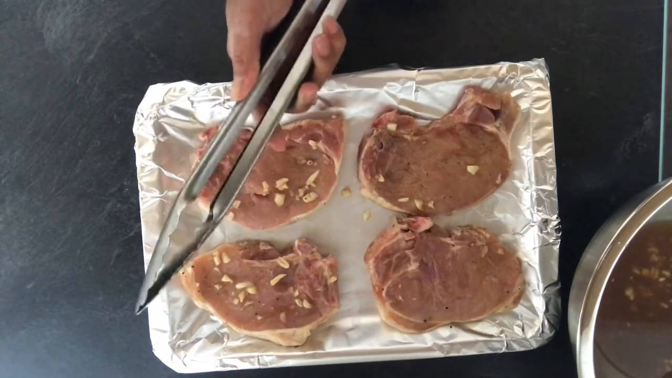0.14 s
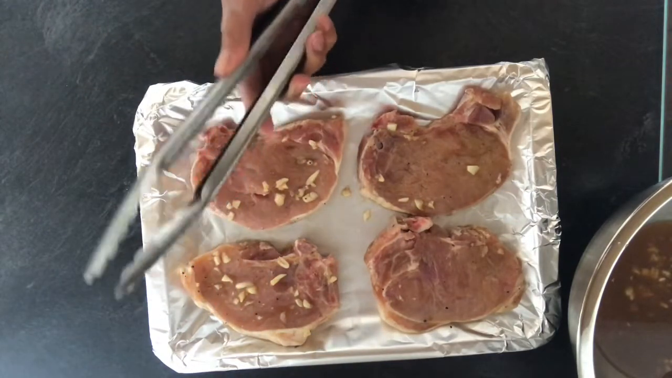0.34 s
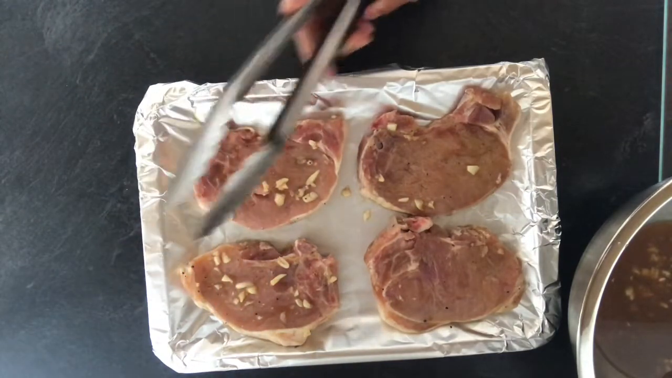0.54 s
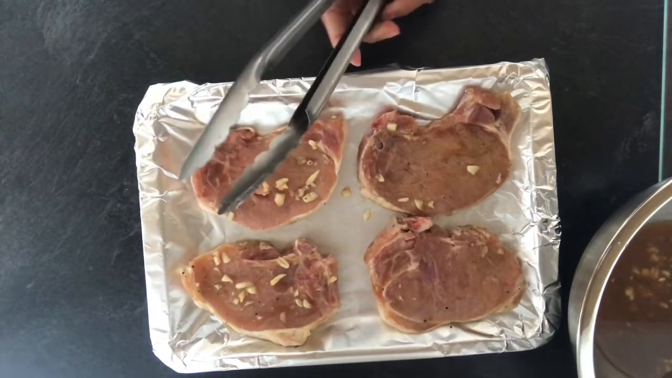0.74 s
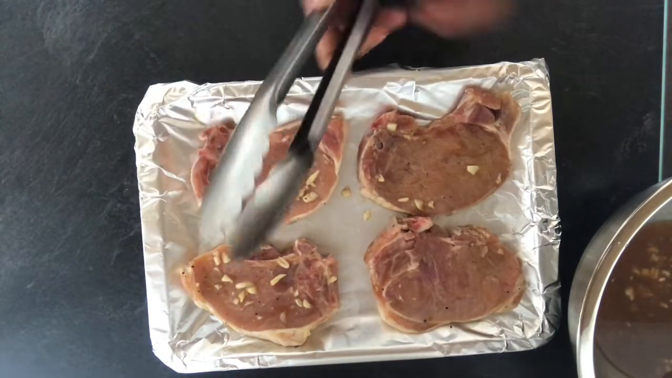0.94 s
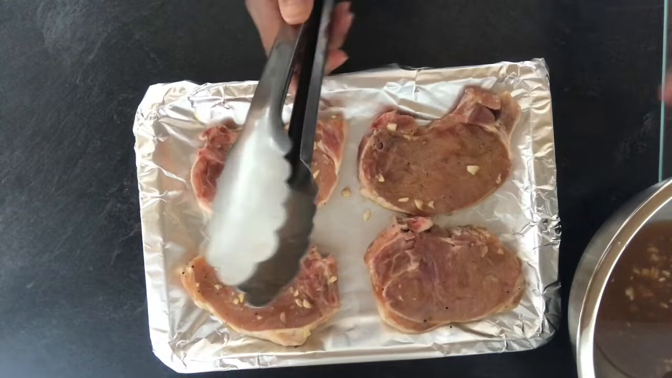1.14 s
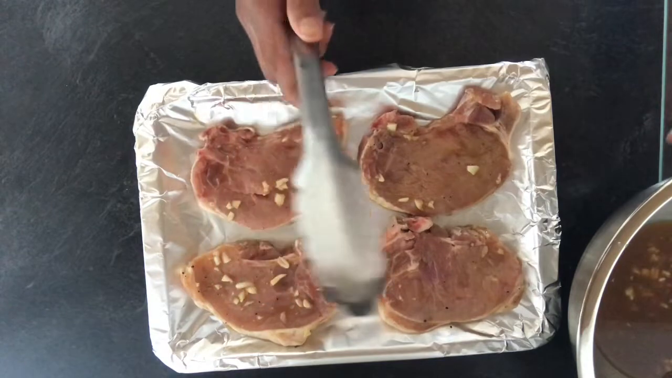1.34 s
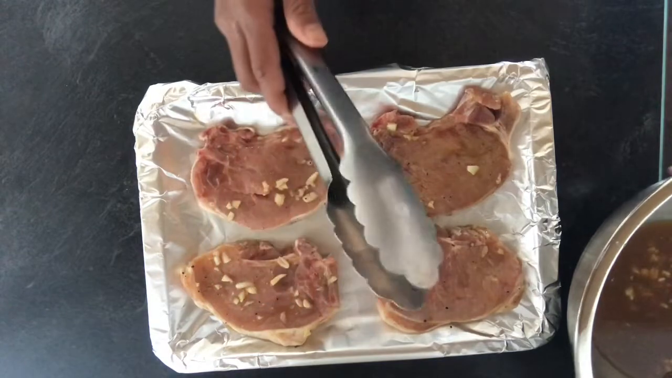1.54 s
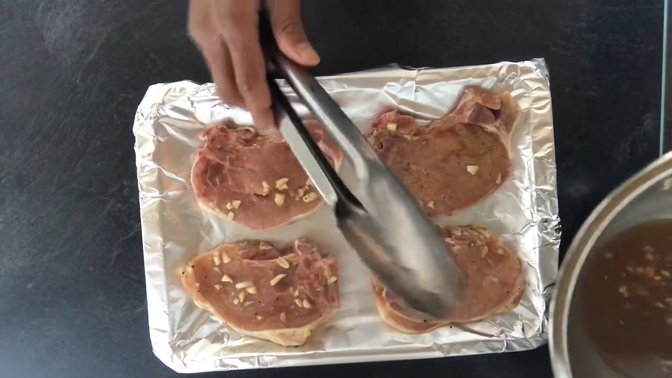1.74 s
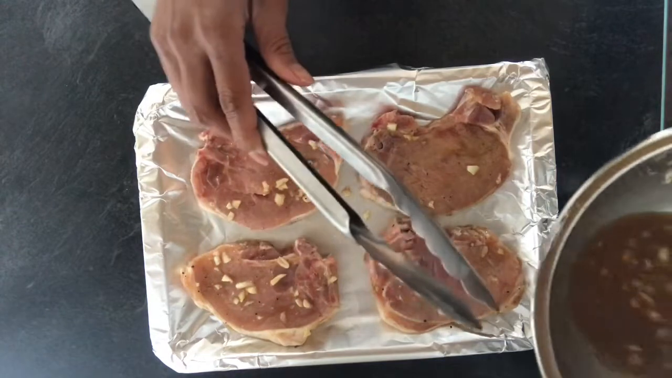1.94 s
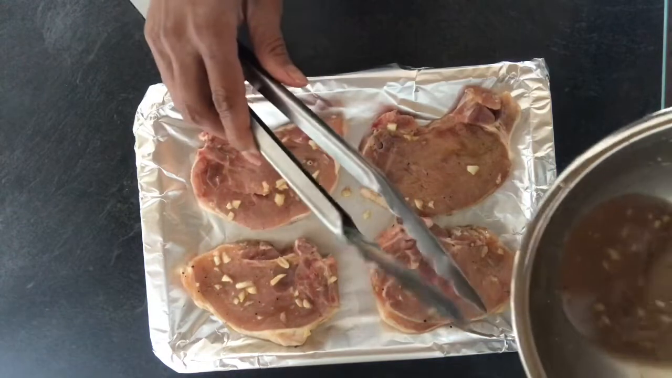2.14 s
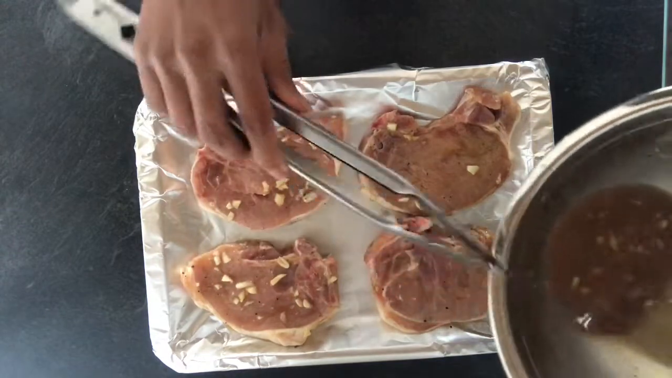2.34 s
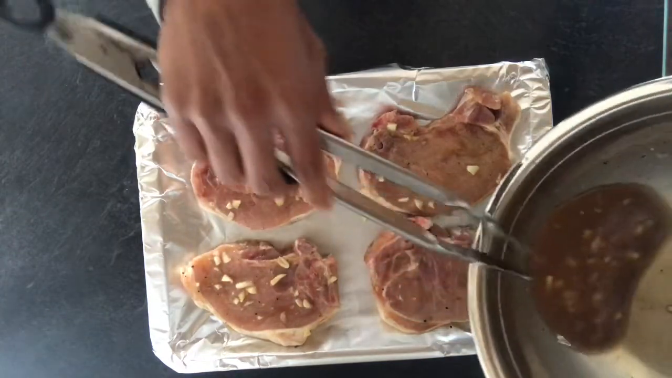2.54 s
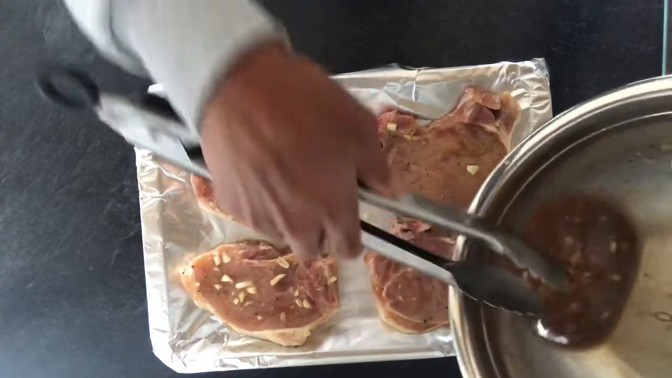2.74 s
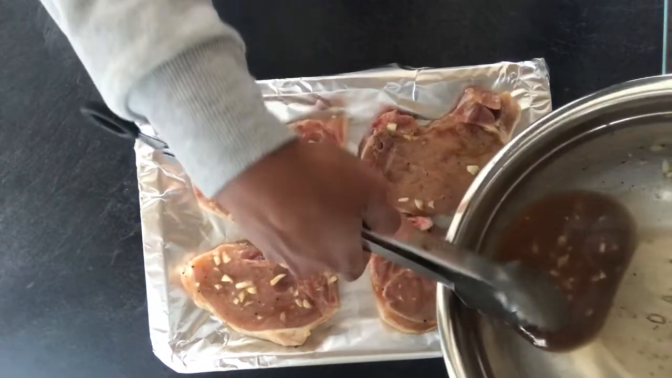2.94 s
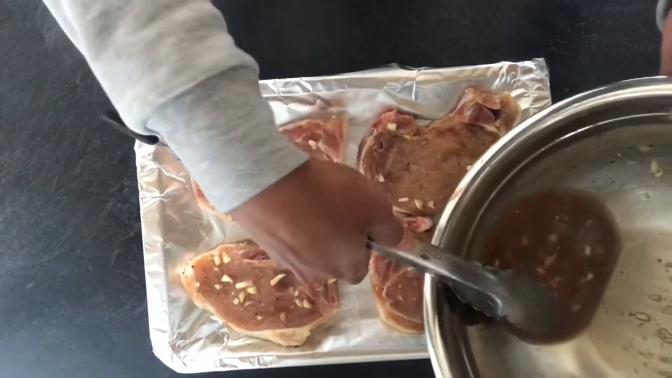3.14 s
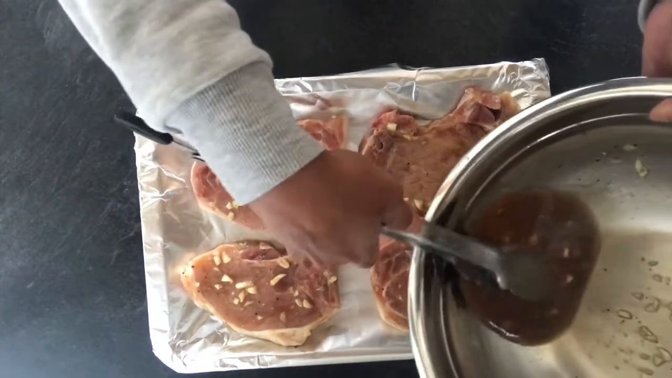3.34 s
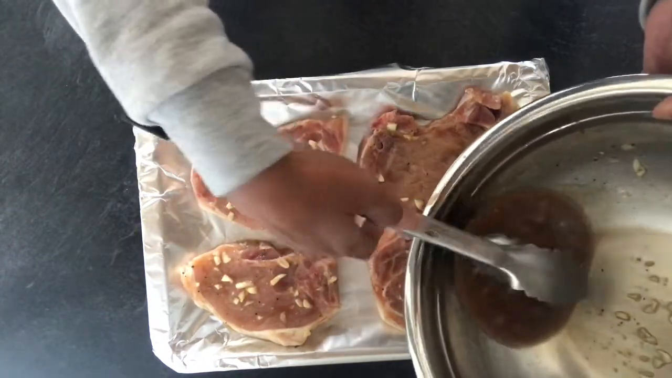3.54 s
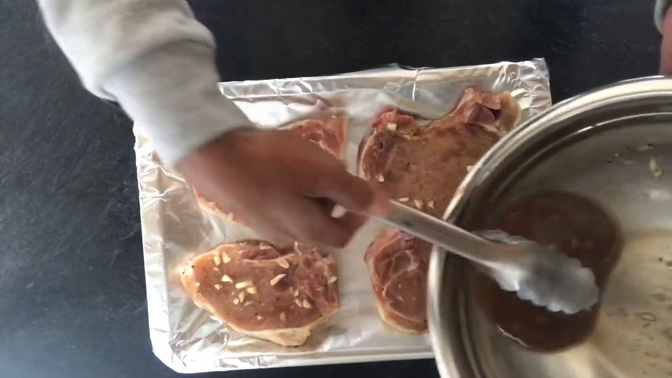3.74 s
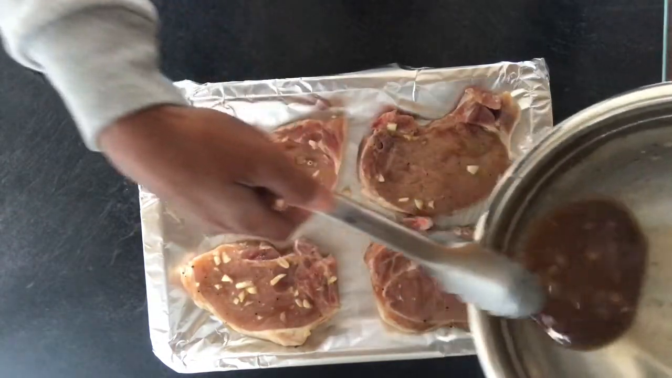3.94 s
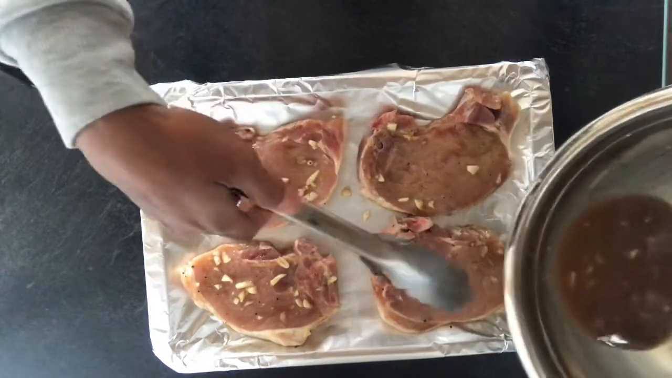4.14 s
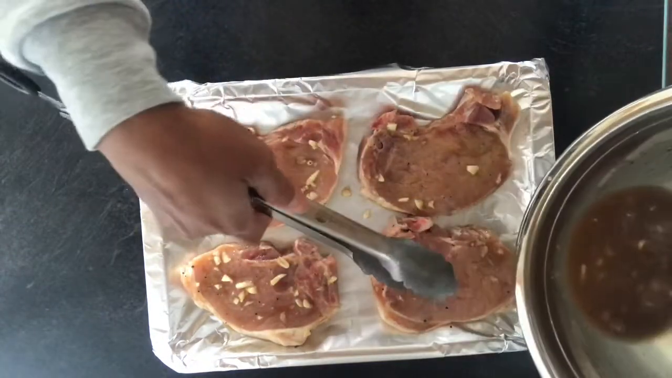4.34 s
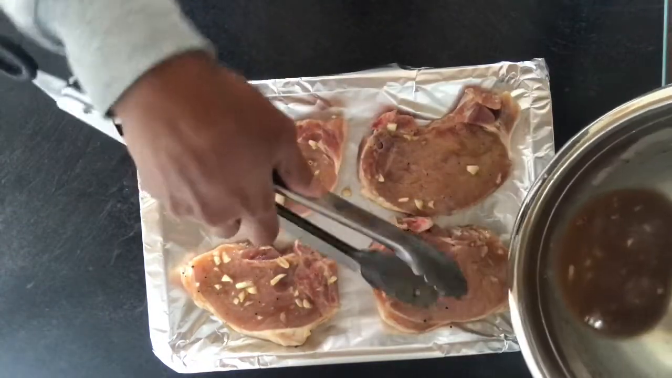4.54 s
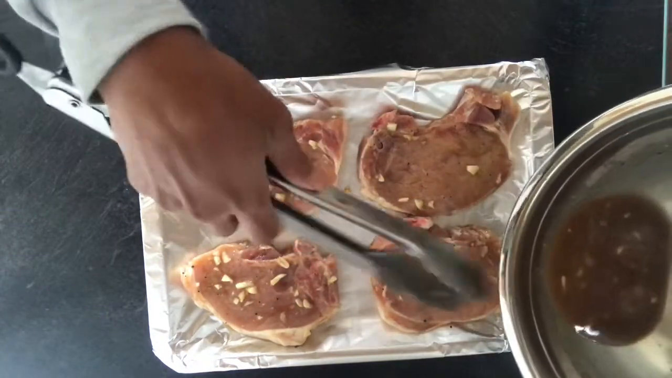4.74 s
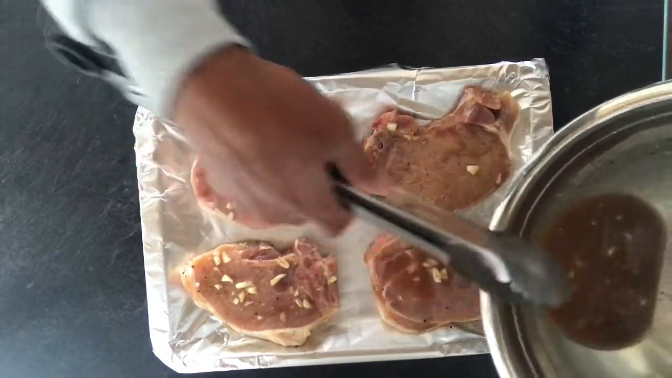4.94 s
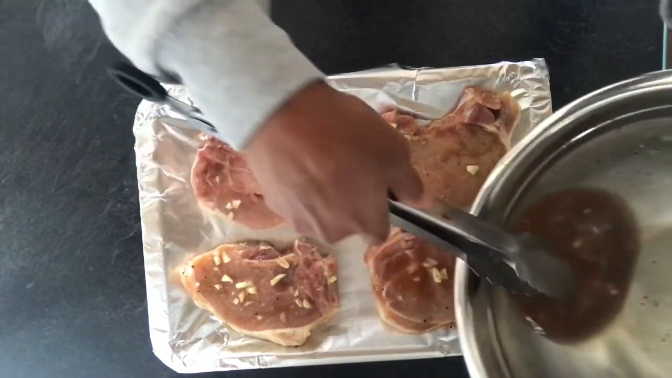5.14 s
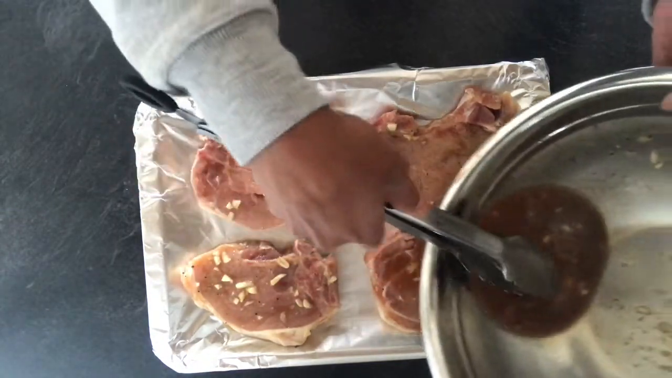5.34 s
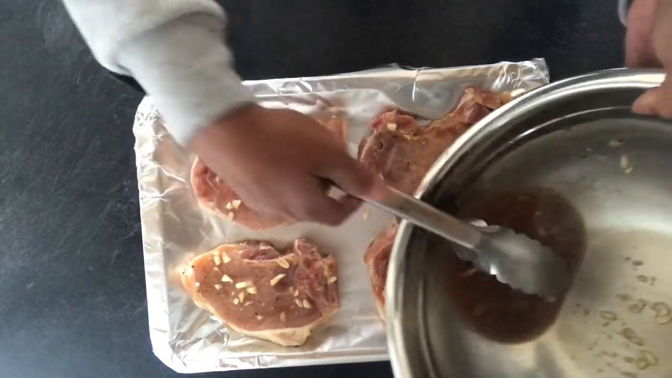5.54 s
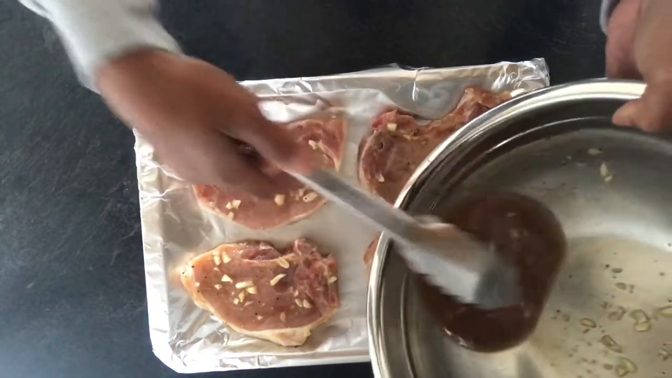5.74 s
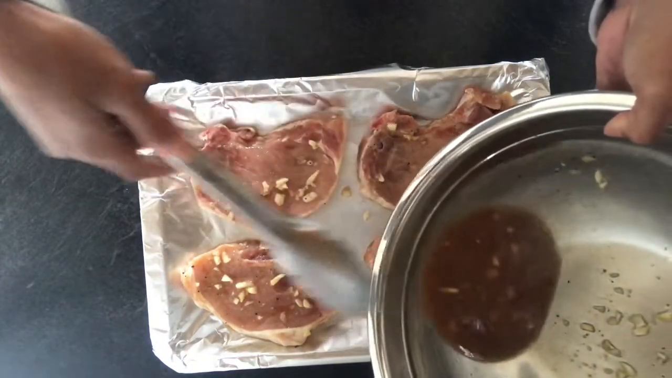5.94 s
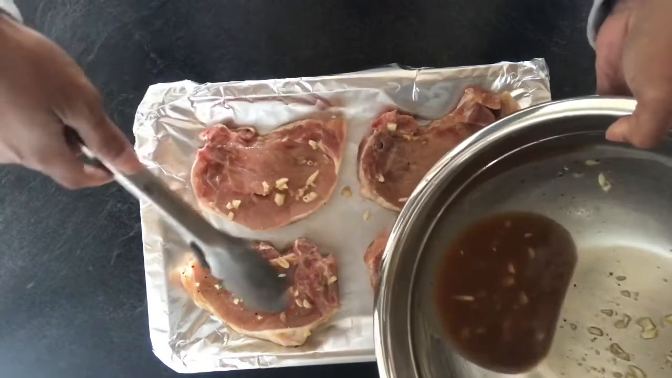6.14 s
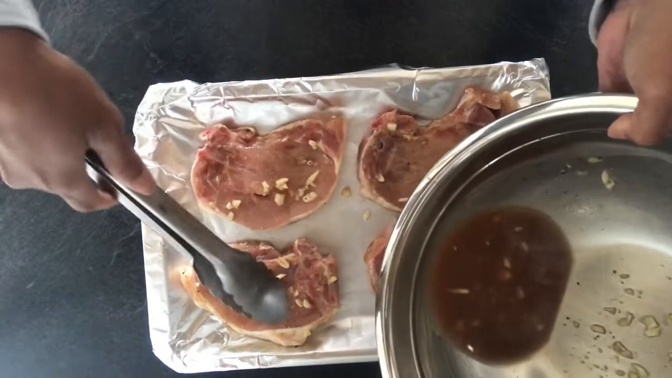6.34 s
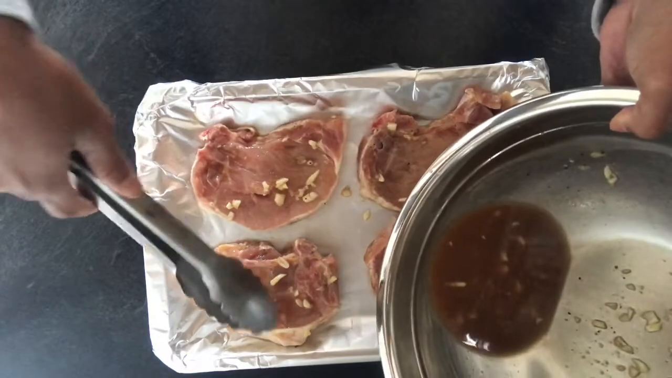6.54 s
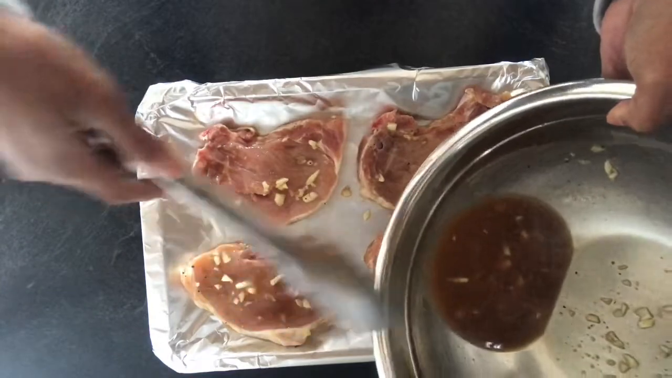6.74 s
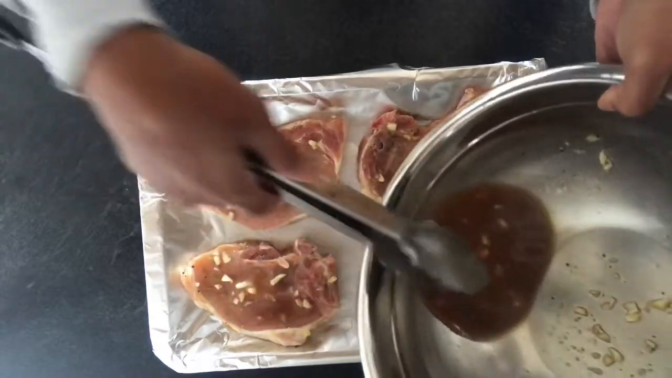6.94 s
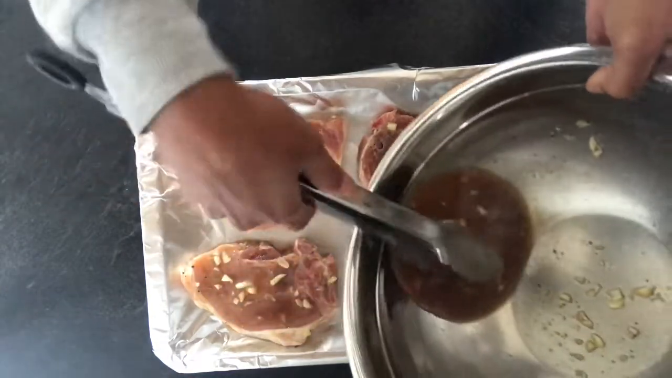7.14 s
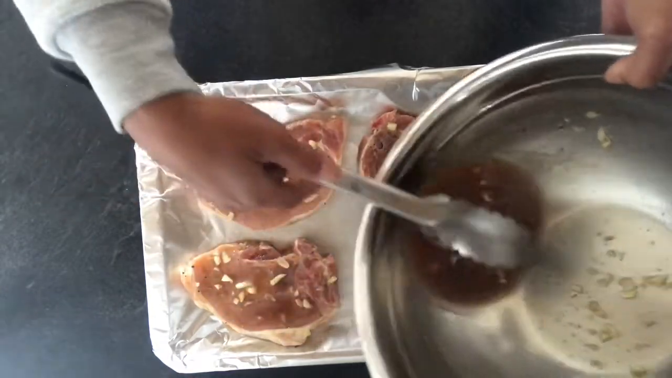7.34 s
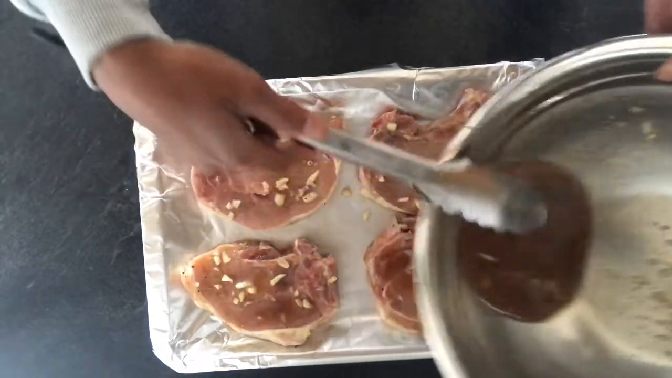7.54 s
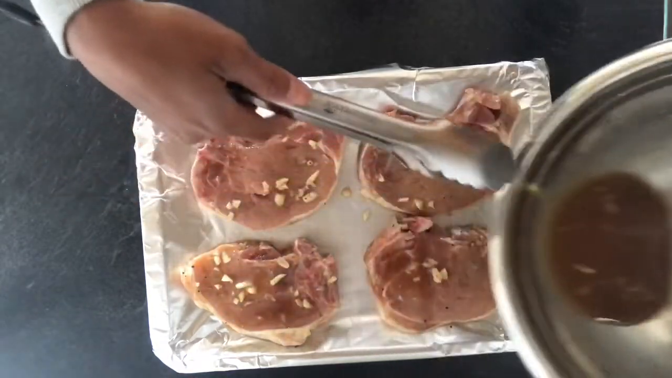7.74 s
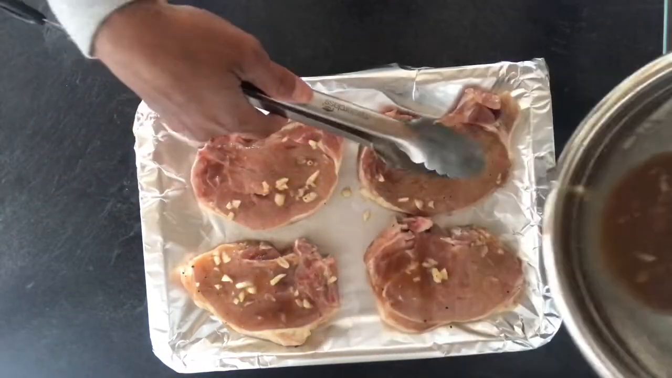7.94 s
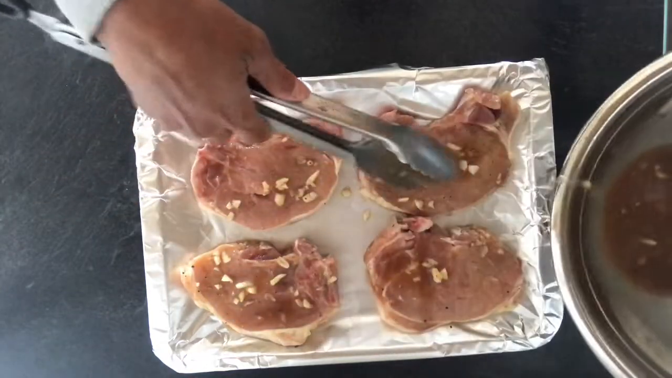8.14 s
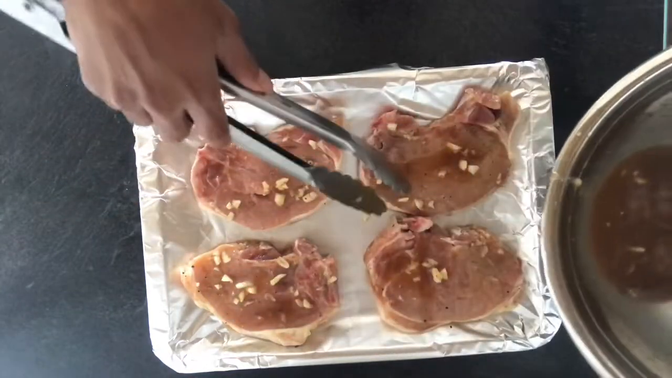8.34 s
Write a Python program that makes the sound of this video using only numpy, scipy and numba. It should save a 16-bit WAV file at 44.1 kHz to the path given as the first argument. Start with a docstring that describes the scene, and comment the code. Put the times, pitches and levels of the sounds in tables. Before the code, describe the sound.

In a quiet kitchen, tongs snap shut nearby, followed by light crinkles of aluminium foil and one dull thud of a bowl on the counter. The tongs knock inside the steel bowl, which rings, then drag and squeak along its wall. A second, louder clang brings another brief scrape and a click of the tips, and a third clang comes near the end. Faint hums waver underneath, and hard walls add a short tail.

```python
"""A steel bowl rings as steel tongs knock, scrape and squeak inside it, over a foil-lined tray in a quiet kitchen.
Each blow is a snap, a clang and a free ring; the tongs also clack shut and click their tips.
Foil rubs and ticks under the hand as its creases snap, and the bowl thuds on the counter once.
Low hums waver over the room's hush, and hard walls add a short tail to the metal and foil."""
import numpy as np
import sys
import numpy as np
from scipy import signal
from scipy.fft import rfft, irfft
from scipy.io import wavfile
from scipy.ndimage import uniform_filter1d
from numba import njit

SR = 44100
rng = np.random.default_rng(int(sys.argv[2]) if len(sys.argv) > 2 else 0)


def digitize_waveform(pressure):
    """Quantize a signal to 16-bit integers and store it at the path in sys.argv[1].

    Rows of a 2-D input are taken as channels; values are limited to [-1, 1].
    """
    field = np.atleast_2d(pressure).T
    bounded = np.clip(field, -1, 1)
    quanta = np.round(bounded * 32767).astype(np.int16)
    wavfile.write(sys.argv[1], SR, quanta)


N = 373968
T = np.arange(N) / SR

# room tone spectrum: f/Hz, level/dB
HUSH_SPECTRUM = [(24, -34.5), (40, 0.5), (69, 2.5), (170, -3), (218, -3.5), (351, -6.5), (485, -10),
                 (608, -9.5), (1820, -17.5), (3670, -19), (4950, -22), (6680, -21), (10500, -29),
                 (12500, -25), (15600, -29)]
# decay of the kitchen's tail: f/Hz, t60/s
ROOM_DECAY = [(200, 0.74), (1000, 0.33), (3500, 0.33), (8000, 0.18), (15000, 0.22)]
# fader rides of the three hums: t/s, level/dB
LOW_HUM_RIDE = [(2.85, -68), (3.22, -53.5), (3.5, -55.5), (3.56, -62.5), (3.989, -57.5), (4.53, -62),
                (4.61, -70.5), (4.9, -55.5), (5.32, -65), (5.6, -76), (5.83, -64.5), (6.33, -78.5),
                (6.708, -63), (7.03, -82), (7.37, -69), (7.6, -74)]
MID_HUM_RIDE = [(7.45, -83), (7.576, -66.5), (8.347, -68.5), (8.48, -79.5)]
HIGH_HUM_RIDE = [(1.95, -76), (1.98, -73.5), (2.69, -57.5), (2.77, -78), (2.82, -53), (2.93, -61.5),
                 (3.71, -64), (3.88, -70), (4.04, -62), (4.11, -79), (4.26, -66.5), (5.6, -78.5),
                 (6.0, -70), (6.22, -83.5), (6.3, -66.5), (6.73, -78), (7.35, -63.5), (7.9, -69),
                 (8.431, -66.5), (8.48, -80)]
# the bowl landing on the counter: t/s, level/dB
THUDS = [(1.581, -25.5)]
# fader ride of the sliding foil: t/s, level/dB
FOIL_RIDE = [(1.38, -101), (1.404, -56.5), (1.43, -59), (1.452, -67), (1.516, -60), (1.532, -73),
             (1.62, -76)]
# spectrum of the sliding foil: f/Hz, level/dB
FOIL_SPECTRUM = [(590, -8.5), (1000, -9), (1550, -22), (1850, -10), (3010, -11), (3500, -21), (6330, 6),
                 (8450, -11), (16000, -20)]
# creases snapping: t/s, level/dB, tray knock trim/dB
FOIL_TICKS = [(0.57, -69, -4), (0.861, -68, -8), (1.6805, -67.5, 12.5), (1.699, -60, 4), (1.723, -61, -22),
              (1.742, -56, 0.5), (1.7842, -55, 0), (1.8466, -53, 0), (1.915, -53, 4.5), (1.9938, -54, 1.5),
              (2.0125, -57.5, 1), (2.0611, -52.5, -1.5), (2.1776, -54.5, 1), (2.3389, -53, 3),
              (2.3889, -52, 3.5), (2.4774, -57.5, 7.5), (2.6034, -60.5, 10), (2.7715, -51, -2),
              (3.894, -63, 0), (4.3832, -63, 4), (5.0415, -54.5, -13), (5.1152, -56.5, 0.5),
              (6.3835, -55, 0), (6.3997, -58.5, 6.5), (6.4342, -66.5, 10), (6.8681, -53.5, -2.5),
              (7.0213, -59.5, 0), (7.0894, -61.5, 9.5)]
# ringing modes of each object: f/Hz, level/dB, t60/s
COUNTER_MODES = [(97.4, -1, 0.29), (181, 9, 0.2), (243.5, -9.5, 0.345), (415, -6.5, 0.084)]
TIP_MODES = [(2530, -10.5, .27), (2560, 11, 0.063), (2680, -22, 0.32), (2970, -4.5, 0.17), (3370, -3, 0.14),
             (3200, -5, 0.16), (3402, -26, 0.19), (3556, 7, 0.11)]
TONG_MODES = [(1350, 0, 0.037), (2730, -1, 0.23), (2506, -2.5, 0.24), (3090, -8, 0.17), (3320, -17, 0.22),
              (3474, -6, 0.2), (3700, -7, 0.25), (3804, -2, 0.35), (4500, -6, 0.65), (5240, -35, 0.18),
              (5430, 1, 0.4), (5900, -9, 0.73), (6700, -28, 0.18), (6200, -0.5, 0.13), (7360, -23, 0.38),
              (8150, 0.5, 0.16), (9440, 9, 0.26), (9530, -12, 0.45), (11300, -21, .15), (12070, -7, 0.18),
              (13400, -24, .15)]
BOWL_MODES = [(226, 7, .22), (262, 6.5, 0.38), (750, 4, 0.4), (1038, 1, 0.15), (1091, 0, 0.23),
              (1273, -12, .3), (1338, -10.5, 0.26), (1496, 0, .5), (1529, -1, .5), (1690, -4, 0.26),
              (1968, -2, 0.47), (2010, -9.5, 0.36), (2068, -1, 0.18), (2226, 0, 0.14), (2347, -2, 0.2),
              (2430, 0.5, .26), (2500, -6, 0.2), (2991, -8.5, 0.25), (3128, -9.5, .3), (3174, -0.5, 0.22),
              (3305, -9, 0.26), (3427, -6, 0.26), (3917, -3, .25), (4324, -3.5, 0.12), (4660, -12, .3),
              (4940, -13, .3), (5115, -5.5, .4), (5930, -14.5, 0.34), (5740, -11.5, 0.17),
              (6400, -10, 0.22), (6507, 1.5, 0.12)]
# how strongly a blow excites each object: f/Hz, level/dB
TIP_EQ = [(750, -49), (1100, -34), (1500, -33), (2300, -19), (3200, -14.5), (4500, -34), (6300, -27),
          (13000, -38)]
TONG_EQ = [(250, -52), (750, -42), (1200, -22.5), (2300, -31), (3200, -12), (4500, -20), (6300, -17),
           (9000, -25.5), (13000, -15)]
BOWL_EQ = [(230, -43.5), (480, -43.5), (750, -30.5), (1100, -28.5), (1300, -32), (1500, -22), (2000, -21.5),
           (3200, -24.5), (4500, -18.5), (6300, -16), (9000, -36), (13000, -32.5)]
# blows, each with two EQ bumps that the struck spot favours:
# t/s, level/dB, tilt/(dB per octave), low f/Hz, low boost/dB, high f/Hz, high boost/dB, contact/s
TIP_BLOWS = [(5.68, -22, 0.2, 2600, 2.1, 3500, 1.9, 0.0021), (7.068, -43, 1.5, 2400, 2.3, 6300, 8, 0.0015)]
TONG_BLOWS = [(0.044, -24, 0.32, 1100, 2, 13100, 1.9, 0.0012),
              (0.071, -23.5, 0.5, 1280, 7.4, 3100, 1.8, 0.0028),
              (0.083, -21, -0.2, 1300, 2.8, 2500, 12, 0.00075),
              (2.251, -28.5, 0.53, 1240, 2.1, 5930, 2.3, 0.00266)]
BOWL_BLOWS = [(2.81, -12.5, 1.1, 2100, 2, 6760, 2, 0.004), (3.042, -28.5, -1.5, 1050, 1, 4370, 3, 0.0017),
              (3.265, -29.5, -3, 1500, 2, 6300, 7, 0.002), (3.302, -40, 5, 2500, 7, 4500, 7, 0.004),
              (3.506, -43, -2.5, 900, 1, 6300, 9, 0.0058), (5.094, -47, -4, 1500, 6.5, 2110, 5, 0.0022),
              (5.203, -4, 0.33, 765, 4, 3100, 6.5, 0.0036), (7.251, -10, 0, 1070, 13, 2402, 8, 0.0026),
              (7.62, -48, -3, 2000, 7, 2600, 9, 0.0024)]
# tongs dragged on the wall, one list a stroke: t/s, level/dB, rasp trim/dB, squeal trim/dB, squeal f/Hz
SCRAPE_STROKES = [
    [(2.6, -82, 5, 0.3, 5600), (2.7, -77.5, 4.4, -10, 5580), (2.76, -74, 6, -10, 5500)],
    [(2.86, -49, -7.5, -4.5, 6200), (2.96, -59.5, -10, -4.5, 5960), (3.03, -56.5, -13, -8, 5760),
     (3.15, -59, -13, -3, 5600), (3.23, -55.5, -14, 0, 5600), (3.28, -56, -5.5, 1, 5400),
     (3.42, -59, -5.5, -1.5, 5260), (3.47, -56, 1, -6, 5770), (3.52, -61.5, 0.5, -6, 6100),
     (3.58, -99, 3, -1, 6000)],
    [(5.25, -48, -11.5, -11, 5200), (5.34, -51.5, -5.5, 2, 5150), (5.428, -52, -6, -2, 5150),
     (5.46, -88, -6, -12, 5150)],
]
# tongs catching on the wall: t/s, level/dB, f/Hz, length/s
WALL_SQUEAKS = [(2.999, -48.5, 2070, 0.024), (3.019, -47.5, 1964, 0.042), (3.153, -45.5, 1994, 0.042),
                (5.323, -43.5, 1950, 0.036)]
# tongs flicking the rim: t/s, level/dB
RIM_FLICKS = [(3.271, -58.5), (3.511, -64), (5.421, -55.5)]


def amp(db):
    """dB to gain."""
    return 10 ** (np.asarray(db) / 20)


def unit(x):
    """Normalise to rms 1."""
    return x / np.sqrt(np.mean(x ** 2))


def along(points, hz):
    """Read a breakpoint curve on a log-frequency axis."""
    f, value = np.transpose(points)
    return np.interp(np.log(np.maximum(hz, 1)), np.log(f), value)


def equalise(x, points):
    """Shape x with an EQ curve (f/Hz, level/dB); rms 1."""
    gain = amp(along(points, np.fft.rfftfreq(len(x), 1 / SR)))
    return unit(irfft(rfft(x) * gain, len(x)))


def band(x, lo_hz, hi_hz):
    """Band-pass; rms 1."""
    return unit(signal.sosfilt(signal.butter(2, [lo_hz, hi_hz], "bandpass", fs=SR, output="sos"), x))


@njit
def swept_band(x, hz, width_hz):
    """State-variable band-pass with a moving centre, where the gain is 1."""
    y, band_state, low_state = np.empty(len(x)), 0., 0.
    for i in range(len(x)):
        g, damping = np.tan(np.pi * hz[i] / SR), width_hz / hz[i]
        passed = (band_state + g * (x[i] - low_state)) / (1 + g * (g + damping))
        band_state = 2 * passed - band_state
        low_state += 2 * g * passed
        y[i] = damping * passed
    return y


def automation(rows):
    """A gate with 10 ms fades outside the rows, then one lane for each column after time."""
    times, *columns = np.transpose(rows)
    gate = np.interp(T, [times[0] - .01, times[0], times[-1], times[-1] + .01], [0, 1, 1, 0])
    return [gate] + [np.interp(T, times, column) for column in columns]


def add(out, start_s, x):
    """Mix x into out at start_s."""
    i = int(start_s * SR)
    out[i:i + len(x)] += x[:N - i]


def ring(modes, rough):
    """Decaying complex tones, one a mode, and their time axis; loose contact jitters the high ones."""
    t = np.arange(SR * 2 // 3) / SR
    hz, db, t60 = np.transpose(modes)[:, :, None]
    walk = np.cumsum(rng.standard_normal((len(modes), len(t))), axis=1)
    jitter = rough * (hz / 3000) ** 2 * walk / (1 + (hz / 6000) ** 2)
    return amp(db) * np.exp((2j * np.pi * hz - np.log(1000) / t60) * t + 1j * jitter), t


def grit(spread_db, patch_hz):
    """Friction texture: dense slips of uneven size, bunched in patches; rms 1."""
    size = int(SR / patch_hz)
    steps = np.repeat(rng.standard_normal(N // size + 1), size)[:N]
    return unit(rng.standard_normal(N) * amp(spread_db * uniform_filter1d(steps, size)))


def hush():
    """A steady bed of dark room tone."""
    return amp(-66) * equalise(rng.standard_normal(N), HUSH_SPECTRUM)


def hums():
    """Three low tones that come and go, wavering in level and pitch."""
    out = np.zeros(N)
    for hz, ride, waver_db in [(60.5, LOW_HUM_RIDE, 2.2), (73.5, MID_HUM_RIDE, 1.3),
                               (141, HIGH_HUM_RIDE, 4)]:
        gate, db = automation(ride)
        tremolo, vibrato = band(rng.standard_normal((2, N)), 2.4, 27)
        phase = 2 * np.pi * np.cumsum(hz * (1 + 0.015 * vibrato)) / SR
        out += gate * amp(db + waver_db * tremolo) * np.sin(phase)
    return np.sqrt(2) * out


def kitchen(x, wet_db):
    """Hard walls answer with a dense tail that loses its treble first."""
    t, tail = np.arange(SR // 2) / SR, 0
    for hz in 100 * 2 ** np.arange(0, 7.6, .5):  # half-octave bands
        noise = band(rng.standard_normal(len(t)), hz / 2 ** .25, hz * 2 ** .25)
        decay = np.exp(-np.log(1000) * t / along(ROOM_DECAY, hz))
        tail = tail + np.sqrt(hz) * noise * decay
    tail = tail * (1 - np.exp(-t / .004)) / np.sqrt(np.sum(tail ** 2))
    return x + amp(wet_db) * signal.fftconvolve(x, tail)[:N]


def counter_thud():
    """The bowl's foot lands softly and wakes the counter's low modes."""
    out = np.zeros(N)
    tones, t = ring(COUNTER_MODES, rough=0)
    thud = np.imag(tones.sum(axis=0)) * (1 - np.exp(-t / 0.0016))
    for start_s, db in THUDS:
        add(out, start_s, amp(db - 12) * thud)
    return out


def foil():
    """Foil slides in one short rub; single creases snap and knock the tray."""
    gate, ride_db = automation(FOIL_RIDE)
    out = gate * amp(ride_db) * equalise(grit(2.6, patch_hz=120), FOIL_SPECTRUM)
    t = np.arange(SR // 20) / SR
    knock = (np.sin(2 * np.pi * 410 * t) + .7 * np.sin(2 * np.pi * 490 * t)) * np.exp(-t / 0.0068)
    for start_s, db, knock_db in FOIL_TICKS:
        snap = band(rng.standard_normal(len(t)), 4700, 6400) * np.exp(-t / 0.0024)
        add(out, start_s, amp(db + 1.5) * (snap + amp(knock_db - 7) * knock))
    return out


def rim(force, sustain):
    """A force drives the bowl's two close rim modes near 1.5 kHz, which beat; sustain scales their t60."""
    out = np.zeros(N)
    for hz, db, t60 in BOWL_MODES:
        if 1450 < hz < 1600:
            radius, angle = np.exp(-np.log(1000) / (sustain * t60 * SR)), 2 * np.pi * hz / SR
            poles = [1, -2 * radius * np.cos(angle), radius ** 2]
            out += amp(db) * np.sin(angle) * signal.lfilter([1], poles, force)
    return out


def rim_flicks(decay_s=0.003):
    """Soft flicks of the tongs leave only the rim pair singing."""
    force, t = np.zeros(N), np.arange(SR // 20) / SR
    flick = np.sin(2 * np.pi * 1512 * t) * np.exp(-t / decay_s) * 2 / (decay_s * SR)
    for start_s, db in RIM_FLICKS:
        add(force, start_s, amp(db) * flick)
    return rim(force, sustain=1.03)


def squeaks():
    """The tongs catch on the wall: short, rough tones that swell and fade."""
    out = np.zeros(N)
    for start_s, db, hz, length_s in WALL_SQUEAKS:
        t = np.arange(int(length_s * SR)) / SR
        jitter = 0.069 * np.cumsum(rng.standard_normal(SR // 10))[:len(t)]
        swell = np.sin(np.pi * t / length_s) ** 2
        add(out, start_s, amp(db) * swell * np.sin(2 * np.pi * hz * t + jitter))
    return out


def scrapes():
    """Dragged tongs slip: they rumble, rasp, squeal in moving resonances and set the rim singing."""
    slips = grit(4.5, patch_hz=100)
    rumble, rasp, grind = band(slips, 320, 510), band(slips, 850, 1200), band(slips, 1600, 3800)
    hiss, air = band(slips, 4500, 7200), band(slips, 7100, 15500)
    drift = 1 + 0.04 * band(rng.standard_normal(N), 1.5, 10)  # resonances move with the contact
    wall = amp(-10) * unit(swept_band(slips, 2130 * drift, width_hz=150.)) + amp(-0.5) * grind
    whistle = unit(swept_band(slips, 6500 * drift, width_hz=400.))
    sheen = amp(-10) * whistle + amp(-8.5) * hiss + amp(-12) * air
    out, rim_force = np.zeros(N), np.zeros(N)
    for stroke in SCRAPE_STROKES:
        gate, db, rasp_db, squeal_db, squeal_hz = automation(stroke)
        squeal = amp(-2.5) * unit(swept_band(slips, squeal_hz, width_hz=300.)) + sheen
        out += gate * amp(db) * (amp(-15) * rumble + amp(rasp_db) * rasp + wall + amp(squeal_db) * squeal)
        rim_force += gate * amp(db + rasp_db - 38.5) * slips
    return out + rim(rim_force, sustain=1.1)


def bump(hz, centre_hz, octaves=0.2):
    """Bell curve over the pitch region that a struck spot favours."""
    return np.exp(-.5 * (np.log2(hz / centre_hz) / octaves) ** 2)


def blows(hits, modes, eq, snap_db, crack_db, ring_db, clang_db, rise_s, rough):
    """Steel on steel: a snap and a noisy crack, a loud clang that the touch damps, then the free ring."""
    out = np.zeros(N)
    tones, t = ring(modes, rough)
    mode_hz, eq_hz = np.transpose(modes)[0], np.geomspace(100, 20000, 60)
    burst_t = t[:SR // 8]
    snap_s, full_contact_s = 0.00055, 0.004
    for start_s, db, tilt_db, low_hz, low_db, high_hz, high_db, contact_s in hits:
        tint_db = along(eq, eq_hz) + tilt_db * np.log2(eq_hz / 2000)
        tint_db += low_db * bump(eq_hz, low_hz) + high_db * bump(eq_hz, high_hz)
        pink_tint = np.transpose([eq_hz, tint_db - 10 * np.log10(eq_hz)])
        noise = equalise(rng.standard_normal(len(burst_t)), pink_tint)
        crack = noise * (1 - np.exp(-burst_t / rise_s)) * np.exp(-burst_t / contact_s)
        snap = band(noise, 2700, 16000) * (burst_t / snap_s) * np.exp(1 - burst_t / snap_s)
        burst = crack + amp(snap_db) * snap
        burst = np.sqrt(np.mean(burst ** 2)) * band(burst, 150, 20000)  # the crack carries nothing below 150 Hz
        add(out, start_s, amp(db + crack_db) * burst)

        gains = amp(along(np.transpose([eq_hz, tint_db]), mode_hz))
        phases = np.exp(2j * np.pi * rng.random(len(mode_hz)))
        damping = (mode_hz[:, None] / 3000) ** 0.3 / (2 * contact_s)  # the touch damps high modes first
        clang = amp(clang_db) * np.exp(-t * damping)
        free_ring = np.sqrt(contact_s / full_contact_s)  # shorter touches leave less ring
        body = np.imag((gains * phases) @ (tones * (free_ring + clang)))
        add(out, start_s, amp(db + ring_db) * body * (1 - np.exp(-t / rise_s)))
    return out


def tip_clicks():
    """The tips of the tongs meet in a tight click with little ring."""
    return blows(TIP_BLOWS, TIP_MODES, TIP_EQ, snap_db=-10.5, crack_db=-8, ring_db=-22.5, clang_db=24,
                 rise_s=0.00073, rough=0.062)


def tong_clacks():
    """The arms of the tongs clack together and ring brightly."""
    return blows(TONG_BLOWS, TONG_MODES, TONG_EQ, snap_db=-6.5, crack_db=1, ring_db=-10, clang_db=19,
                 rise_s=0.0011, rough=0.052)


def bowl_knocks():
    """The tongs strike the bowl and its thin wall rings in many modes."""
    return blows(BOWL_BLOWS, BOWL_MODES, BOWL_EQ, snap_db=-9.5, crack_db=-4.5, ring_db=-13.5, clang_db=16,
                 rise_s=0.0011, rough=0.06)


def scene():
    """Mono mix: metal and foil feed the kitchen reverb; thud, hums and hush sit dry beneath."""
    knocks = bowl_knocks() + tong_clacks() + tip_clicks()
    crinkle = foil()
    shaken_rim = rim(amp(-31) * crinkle, sustain=.8)  # the foil reaches the bowl through the counter
    foreground = knocks + scrapes() + squeaks() + rim_flicks() + crinkle + shaken_rim
    return (kitchen(foreground, wet_db=-8) + counter_thud() + hums() + hush())[None]


def record(dry):
    """Master EQ: a low cut at 42 Hz and a steep high cut just under 16 kHz."""
    low_cut = signal.sosfilt(signal.butter(3, 42, "highpass", fs=SR, output="sos"), dry)
    return signal.sosfilt(signal.ellip(8, .2, 60, 15950, fs=SR, output="sos"), low_cut)


dry = scene()
out = record(dry)
digitize_waveform(out)
```